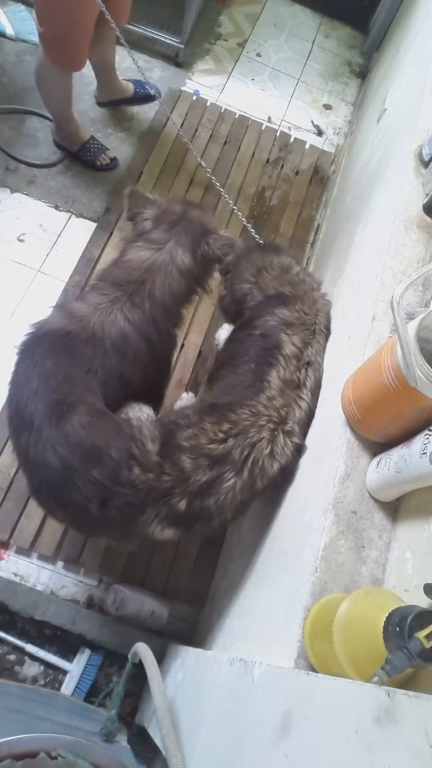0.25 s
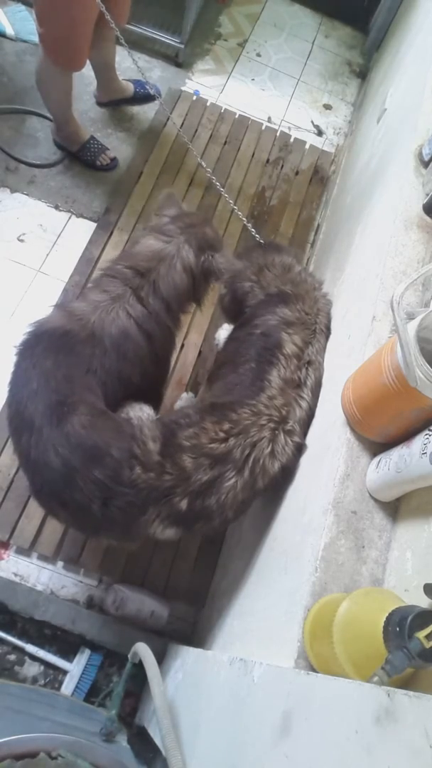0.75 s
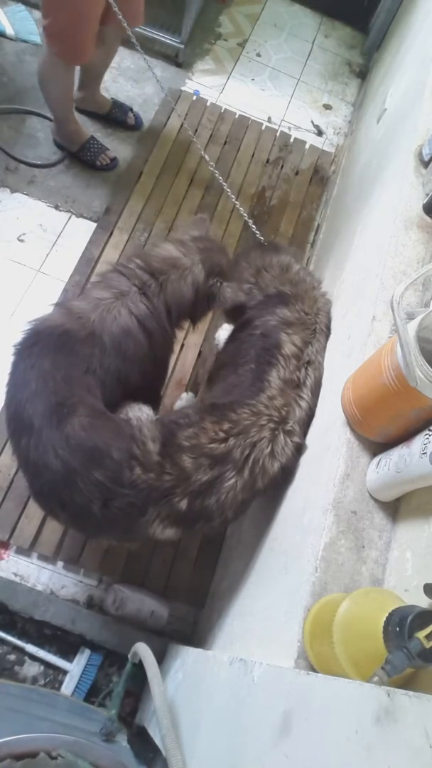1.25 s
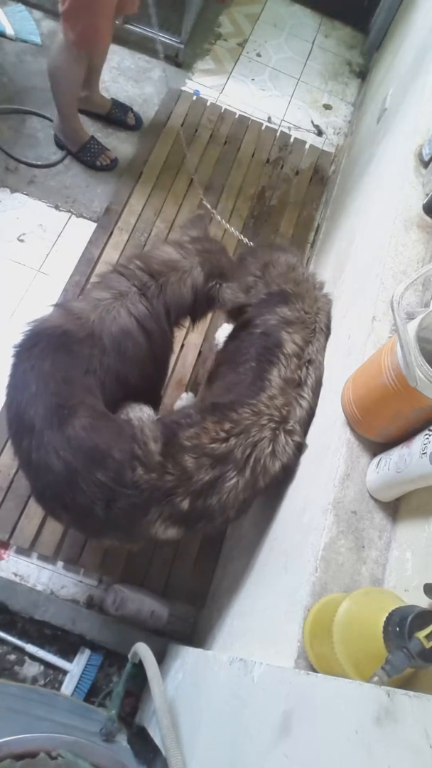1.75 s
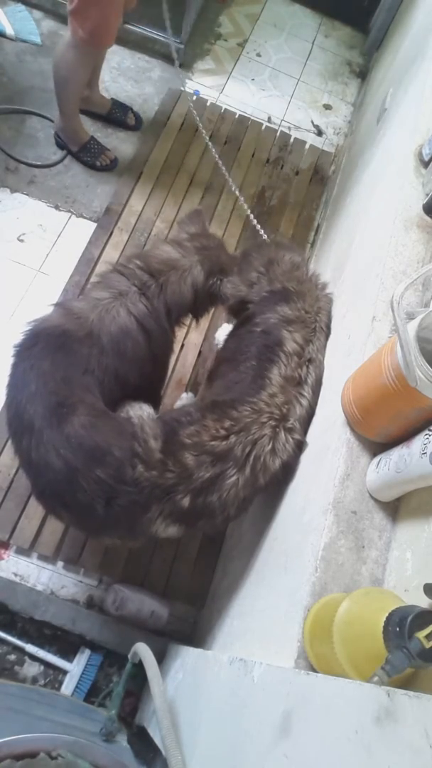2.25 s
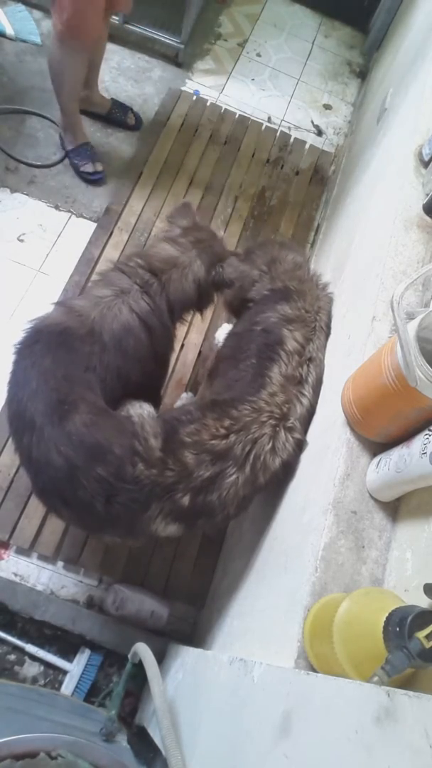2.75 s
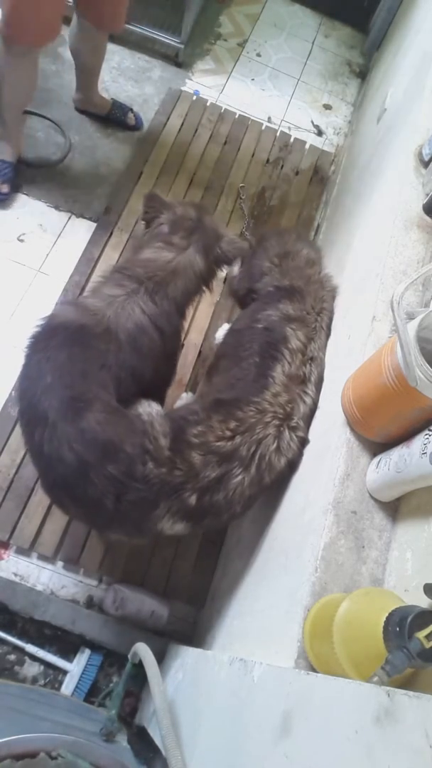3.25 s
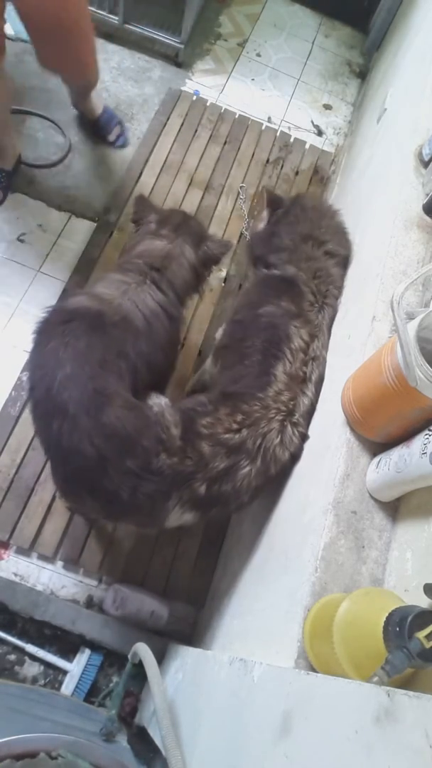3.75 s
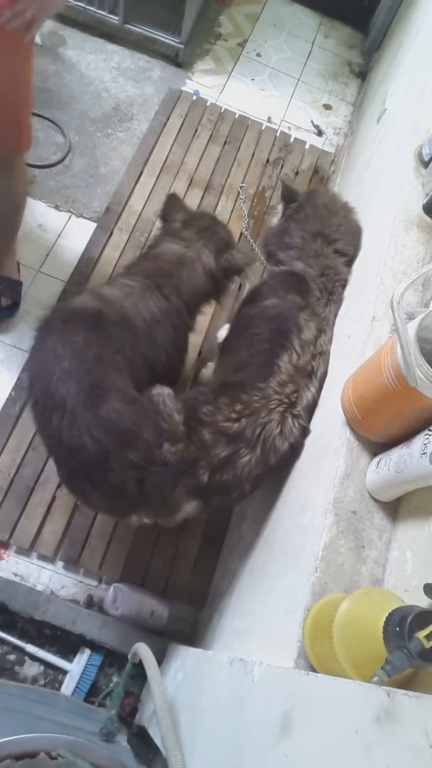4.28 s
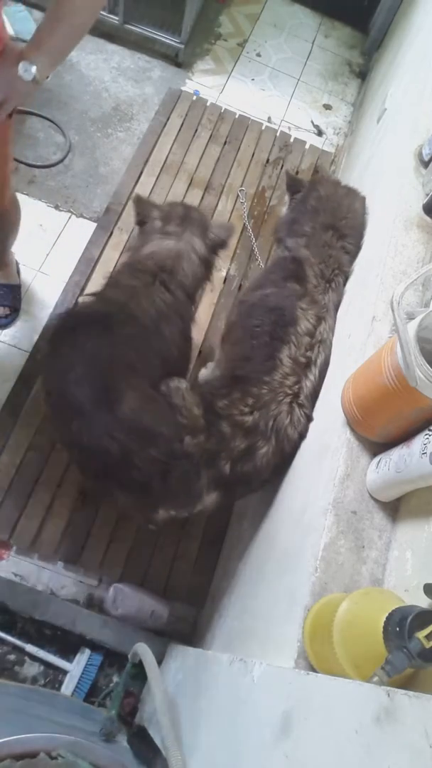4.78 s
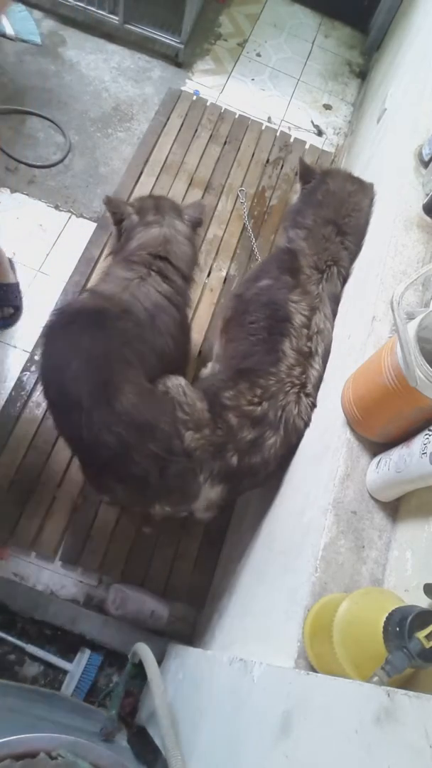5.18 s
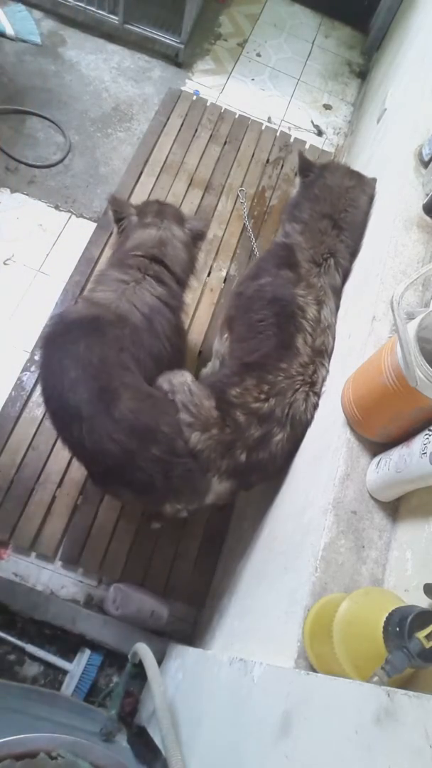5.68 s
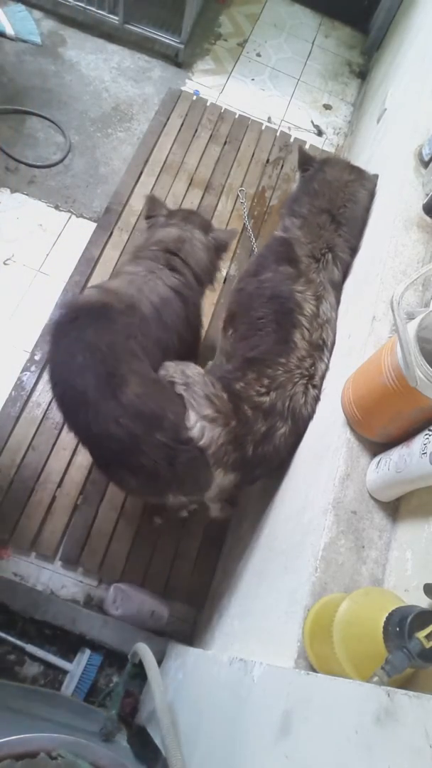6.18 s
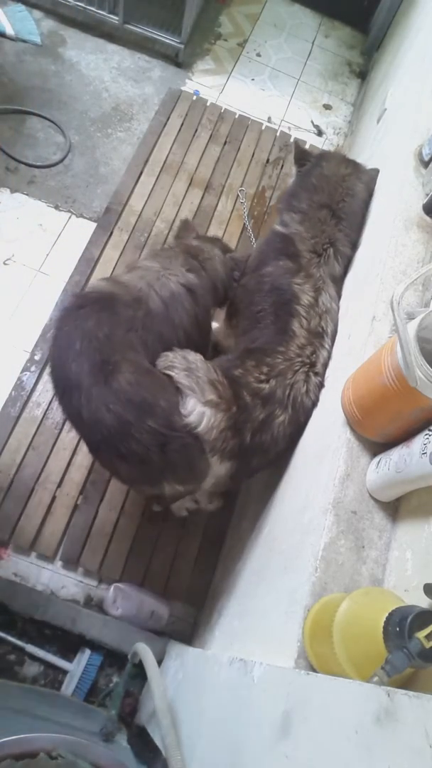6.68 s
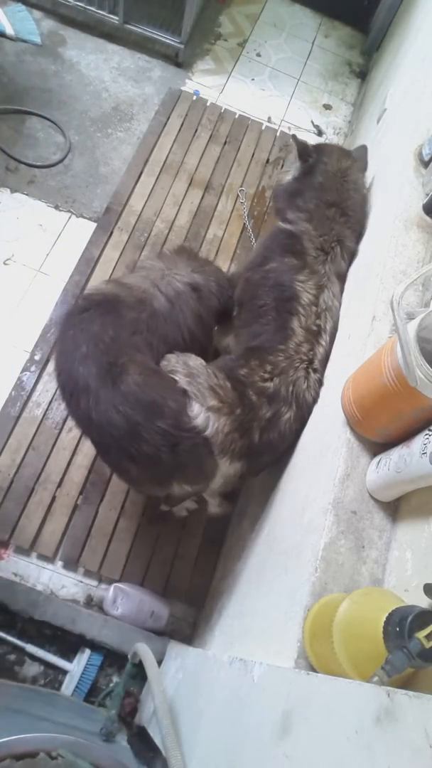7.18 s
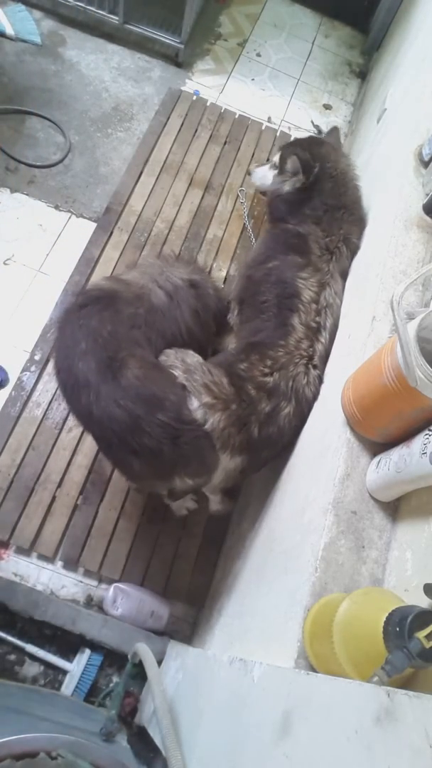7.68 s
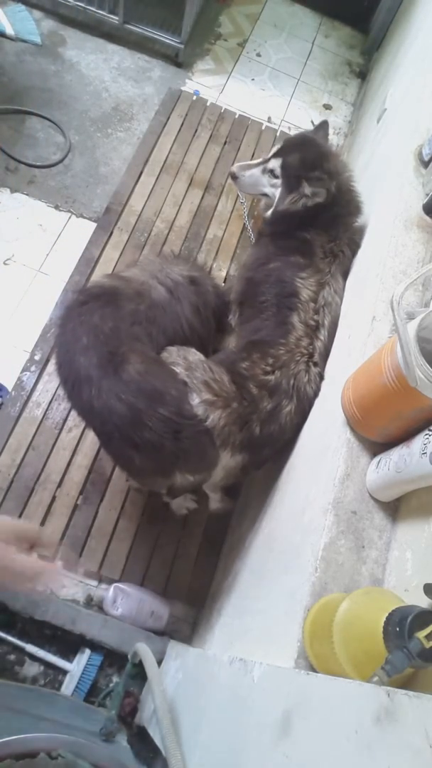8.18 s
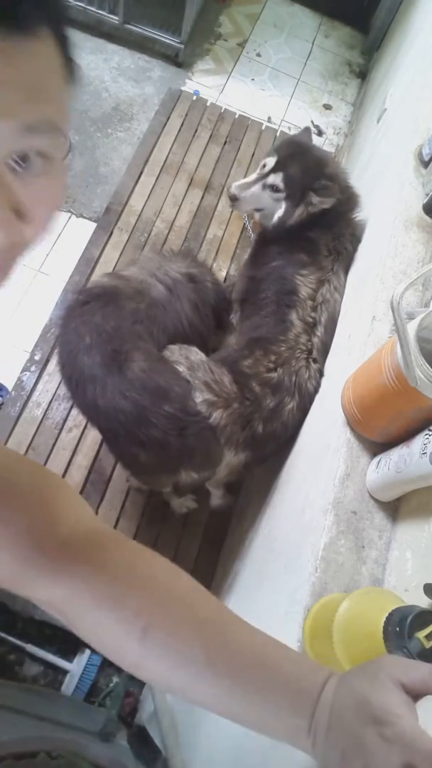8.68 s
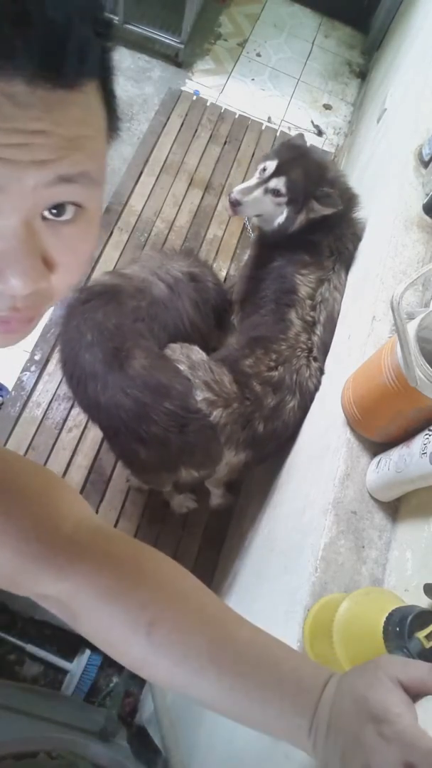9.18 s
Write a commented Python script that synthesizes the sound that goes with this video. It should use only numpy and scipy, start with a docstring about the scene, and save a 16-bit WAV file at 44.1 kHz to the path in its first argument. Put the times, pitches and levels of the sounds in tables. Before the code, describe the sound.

In a small hard-walled washroom, fans whine with a wavering, beating tone that surges about once a second over low hum and rushing air. Light chain ticks come first, then a very loud crash onto wooden slats. The background ducks for about a second and returns, sharp knocks clatter, softer scrapes follow, and faint clinks remain. A more distant motor slowly sinks and fades. Phone microphone with automatic gain, stereo.

```python
"""Washroom fans and a dropped chain leash

Fans whine, hum and blow air in a small tiled wash room where two dogs stand on a slatted deck.
The whine is three blade tones that surge and sag about once a second; the air is shaped noise.
A chain leash crashes onto the slats, things clatter later and links clink: trains of knocks ring in the room.
Behind them another motor, a stack of sinking tones, slowly runs down and fades.
The phone's gain control turns the sound down for the crash and lets it back about a second later."""
import sys
import numpy as np
from scipy import signal
from scipy.fft import rfft, irfft, next_fast_len
from scipy.io import wavfile
from scipy.ndimage import uniform_filter1d, minimum_filter1d

SR = 44100
rng = np.random.default_rng(int(sys.argv[2]) if len(sys.argv) > 2 else 0)


def transcribe(signal):
    """Save signal, clipped to [-1, 1], as a 16-bit WAV file at the path in sys.argv[1]."""
    frames = np.atleast_2d(signal).T
    limited = np.clip(frames, -1, 1)
    pcm = np.round(limited * 32767).astype(np.int16)
    wavfile.write(sys.argv[1], SR, pcm)


N = 415863
TIME = np.arange(N) / SR  # seconds

# How alike a sound is at the left and right microphone ports: (frequency [Hz], correlation)
PORT_LIKENESS = [(60, 1), (200, 0.91), (330, 0.95), (550, 0.62), (1000, -0.055), (2000, 0.063),
                 (8000, -0.051)]


def undb(db):
    """Turn decibels into gain."""
    return 10 ** (np.asarray(db) / 20)


def unit(x):
    """Scale to unit energy, averaged over the channels."""
    return x / np.sqrt(np.mean(np.sum(x ** 2, axis=-1)))


def on_log(points, hz):
    """Read a (Hz, value) table by straight lines on a log-frequency axis."""
    f, value = np.transpose(points)
    return np.interp(np.log(hz), np.log(f), value)


def shape(x, gain):
    """Filter x by gain(Hz), applied to its spectrum."""
    size = next_fast_len(x.shape[-1])
    hz = np.maximum(np.fft.rfftfreq(size, 1 / SR), 1)
    return irfft(rfft(x, size) * gain(hz), size)[..., :x.shape[-1]]


def resonances(rows, hz):
    """Gain of steep resonances (Hz, half width Hz, dB) that each pass unit white noise at their dB."""
    power = 0
    for f, half_width, db in rows:
        peak = undb(db) ** 2 * SR / (np.pi * half_width / 2) / 2
        power = power + peak / (1 + ((hz - f) / half_width) ** 2) ** 2
    return np.sqrt(power)


def walk(rate):
    """Smooth random drift with unit spread; a higher rate (Hz) wanders faster."""
    size = N // 100
    hz = np.fft.rfftfreq(size, N / SR / size)
    drift = irfft(rfft(rng.standard_normal(size)) * np.exp(-(hz / rate) ** 2), size)
    return np.interp(TIME, np.linspace(0, N / SR, size), drift / drift.std())


def port_lag(hz):
    """Phase step between the ports that gives a tone their likeness, to a random side."""
    return np.arccos(np.clip(on_log(PORT_LIKENESS, hz), -1, 1)) * rng.choice([-1, 1])


def diffuse(size):
    """Room noise at two close ports: alike in the bass, unrelated in the treble."""
    mid, side = rng.standard_normal((2, size))

    def alike(hz):
        return np.clip(on_log(PORT_LIKENESS, hz), -.99, .99)

    mid = shape(mid, lambda hz: np.sqrt((1 + alike(hz)) / 2))
    side = shape(side, lambda hz: np.sqrt((1 - alike(hz)) / 2))
    return np.array([mid + side, mid - side])


def panned(x):
    """Colour a stereo sound, since the two ports hear each band a little differently."""
    # Difference between the ports: (frequency [Hz], left minus right [dB])
    port_balance = [(200, 0), (680, 1), (1250, 0.5), (2300, 1.3), (4200, 3.8), (5500, 2.2), (7750, -1.5),
                    (12000, 1.6)]
    halves = np.array([[1], [-1]]) / 2
    return shape(x, lambda hz: undb(on_log(port_balance, hz) * halves))


def surge(kicks):
    """Extra fan speed: each kick of the drive ramps up, then sags back, on top of what the earlier ones left."""
    rise_s, sag_s = 0.32, 0.42
    t = TIME[::100]
    speed = 0
    for kick_s in kicks:
        age = np.maximum(t - kick_s, 0)
        ramp = np.minimum(age / rise_s, 1)
        speed = speed + ramp * np.exp(-np.maximum(age - rise_s, 0) / sag_s)
    return np.interp(TIME, t, speed)


def whine(flutter_db=1.44):
    """Three nearly equal blade tones surge at their own times, swell with speed and beat unevenly together."""
    # Blade tone of each fan: (resting pitch [Hz], lift per surge [Hz], slow wander [Hz])
    blade_tones = [(1129.2, 9, 0.3), (1144.4, 8.3, 0.7), (1148.8, 8, 0.7)]
    # Each fan at the phone, before swell and dip:
    # (left rms [dB], right rms [dB], phase lead of left [rad], swell per surge [dB], waver [dB])
    fan_levels = [(-35.4, -31.4, -0.55, 5.5, 0.4), (-41, -33.2, -1.4, 0, 1.3), (-36.3, -38.5, -2.2, 1, 1.2)]
    # When the drive kicks each slowed fan up to speed again; one row for each fan: (time [s], ...)
    kick_times = [
        [-0.75, -0.03, 1.0, 1.74, 2.24, 3.24, 4.22, 4.98, 5.73, 6.46, 7.49, 8.24, 8.97],
        [-0.8, -0.05, 1.0, 1.7, 2.5, 3.25, 4.3, 5.0, 5.9, 6.5, 7.4, 8.25, 9.1],
        [-0.55, 0.25, 1.05, 1.97, 2.75, 3.5, 4.25, 5.15, 6.02, 6.7, 7.45, 8.5],
    ]
    # The whine turns faint and almost stops beating after the crash:
    # (time [s], change of the lowest tone [dB], change of the upper two [dB])
    whine_dip = [(2.77, 0.6, 0.6), (2.9, 0, -6), (3.2, -4, -7), (3.4, -1.5, -4), (3.66, -1, -7),
                 (3.72, -1, 0), (4.3, -0.4, -0.2)]
    dip_s, lowest_db, upper_db = np.transpose(whine_dip)
    dips = (lowest_db, upper_db, upper_db)
    out = 0
    for tone, levels, kicks, dip_db in zip(blade_tones, fan_levels, kick_times, dips):
        rest_hz, lift_hz, wander_hz = tone
        left_db, right_db, lead, surge_db, waver_db = levels
        speed = surge(kicks)
        pitch = rest_hz + lift_hz * speed + wander_hz * walk(1.42)
        phase = 2 * np.pi * np.cumsum(pitch) / SR
        swell = surge_db * (speed - speed.mean()) + flutter_db * walk(8.4)
        swell = swell + np.interp(TIME, dip_s, dip_db)
        left = undb(left_db + swell + waver_db * walk(2.2)) * np.sin(phase + lead)
        right = undb(right_db + swell + waver_db * walk(2.2)) * np.sin(phase)
        out = out + np.array([left, right])
    return np.sqrt(2) * out  # turns rms levels into peaks


def hum(waver_db=2.8, drift_hz=0.451):
    """Motor and panel tones waver in the moving air; the higher ones reach the two ports out of step."""
    # Steady tones, before swell and waver: (frequency [Hz], rms level [dB])
    hum_tones = [(75.4, -55), (100, -54.5), (153.4, -51), (210, -54), (228.6, -43), (236.7, -39.5),
                 (240.2, -41.5), (244, -45), (251, -48), (335.1, -51.5), (452.2, -47), (457.5, -48.5),
                 (479, -50), (679.6, -56), (702.5, -53), (718.7, -57), (947.5, -56), (3978, -66)]
    # Slow swell of all these tones: (time [s], level [dB])
    hum_swell = [(0, -2), (1.6, -0.5), (2.4, 2), (3.3, -2), (4.6, 1), (5.6, 0), (6.4, -1), (9.4, -0.5)]
    out = 0
    for hz, db in hum_tones:
        phase = 2 * np.pi * np.cumsum(hz + drift_hz * walk(3.52)) / SR
        lag = port_lag(hz)
        out = out + undb(db + waver_db * walk(13.0)) * np.sin([phase, phase + lag])
    return np.sqrt(2) * out * undb(np.interp(TIME, *np.transpose(hum_swell)))


def airflow(swell_db=0.5):
    """Moving air makes a broad rush of noise and blows the resonances of the duct."""
    # Rush of air, before port colour and swell: (frequency [Hz], level in each hertz [dB])
    air_rush = [(20, -102), (30, -86.5), (55, -77.5), (100, -67), (200, -62.5), (400, -61), (600, -67),
                (1000, -66), (1400, -73), (2600, -74.5), (3600, -79.5), (5500, -82.5), (8000, -93),
                (10500, -103), (14500, -113)]
    # Duct resonances: (frequency [Hz], full width 6 dB down [Hz], rms level [dB])
    duct_modes = [(119, 22, -54), (244.7, 20, -41), (462, 50, -42), (946, 33, -48.5), (1192, 50, -45.5),
                  (1830, 240, -50), (2262, 26, -56.5)]
    halved = [(f, width / 2, db) for f, width, db in duct_modes]
    rush = shape(diffuse(N), lambda hz: undb(on_log(air_rush, hz)) * np.sqrt(SR / 2))
    ducts = shape(diffuse(N), lambda hz: resonances(halved, hz))
    return panned(rush) * undb(swell_db * walk(0.44)) + ducts


def room(early_db, split_hz=6000):
    """One second of a tiled room's answer to a click: early echoes, then a tail whose treble dies first."""
    t60_s, treble_t60_s = 0.52, 0.36  # time to fall by 60 dB
    t, noise = TIME[:SR], diffuse(SR)
    low = shape(noise, lambda hz: 1 / (1 + (hz / split_hz) ** 4))
    high = noise - low
    tail = unit(low * 1000 ** (-t / t60_s) + high * 1000 ** (-t / treble_t60_s))
    early = unit(diffuse(SR) * np.exp(-t / .004))
    return unit(tail + undb(early_db) * early)


def spots(early_db, count=4):
    """Spectra of the room's answer to several spots on the deck."""
    return rfft(np.array([room(early_db) for _ in range(count)]), 2 * SR)


def contacts(rattle_s, first_db, count, rate=950, scatter_db=5):
    """A first contact, then links landing ever more weakly, shared out over the spots as trains of clicks."""
    t = TIME[:SR // 2]
    size = (count, len(t))
    # rate is contacts per second over all spots
    trains = (rng.random(size) < rate / SR / count) * np.exp(-(t / rattle_s) ** 2)
    lands = trains > 0
    signs = rng.choice([-1, 1], lands.sum())
    trains[lands] *= signs * undb(scatter_db * rng.standard_normal(lands.sum()))
    trains[rng.integers(count), 0] = undb(first_db)
    return trains


def link_ring(t60=0.24):
    """Steel links ring high in clusters, no two quite alike: noise in narrow bands that dies away."""
    # Ringing clusters: (frequency [Hz], full width 6 dB down [Hz], relative level [dB])
    link_clusters = [(9630, 230, 3.5), (12000, 180, 10.5), (14140, 200, 1.5)]
    halved = [(f, width / 2, db) for f, width, db in link_clusters]
    t = TIME[:SR // 2]
    ring = shape(rng.standard_normal(len(t)), lambda hz: resonances(halved, hz))
    return unit(ring * np.exp(-np.log(1000) * t / t60))


def knock(gain_db):
    """A click with the spectrum gain_db(Hz) that starts at once, with no sound ahead of it."""
    size = SR // 2
    hz = np.maximum(np.fft.rfftfreq(size, 1 / SR), 1)
    # folding the cepstrum gives the click its minimum phase
    cepstrum = irfft(np.log(undb(gain_db(hz))), size)
    cepstrum[1:size // 2] *= 2
    cepstrum[size // 2 + 1:] = 0
    return unit(irfft(np.exp(rfft(cepstrum)), size))


def modes(rows):
    """A struck body's decaying tones, from rows of (Hz, t60 s, dB)."""
    t = TIME[:SR // 2]
    out = 0
    for hz, t60, db in rows:
        tone = np.cos(2 * np.pi * hz * t) * np.exp(-np.log(1000) * t / t60)
        out = out + undb(db) * unit(tone)
    return out


def add(out, s, db, body, rattle_s, first_db, paths):
    """Rattle a body at time s over the spots of paths; db is its rms if it lasted a tenth of a second."""
    trains = rfft(contacts(rattle_s, first_db, len(paths)), 2 * SR)
    start = int(s * SR)
    in_room = (trains[:, None] * paths).sum(axis=0)
    sound = unit(irfft(in_room * rfft(body, 2 * SR))[:, :SR])[:, :N - start]
    out[:, start:start + sound.shape[1]] += sound * np.sqrt(SR / 10) * undb(db)


def clatter():
    """Heavy landings crack, ring the slats, boom in the hollow under them and set the links singing."""
    # Hard things landing on deck and floor: (time [s], level over 0.1 s [dB], rattle [s],
    # brightness [dB per octave], link ring [dB], hollow boom [dB],
    # first contact over the later ones [dB], favoured slat mode [Hz])
    landings = [(2.7635, -2, 0.058, 2, -22, -28, 9.5, 1600), (2.805, -2, 0.047, 0.5, -20, -26, 8, 1600),
                (2.845, -4, 0.032, -0.5, -32, -20, 7, 1400), (2.905, -9.5, 0.061, -1.5, -35, -35, 4, 1400),
                (2.98, -11, 0.054, 0.5, -18, -5, -4, 1600), (3.012, -10.5, 0.059, 0.5, -16.5, -28, 5, 1600),
                (3.455, -32.5, 0.064, -5.5, -17, -48, -2, 1900),
                (3.975, -42.5, 0.019, 2, -22, -23, 10, 1900), (4.111, -42, 0.037, -2, -41, -27.5, 8, 1900),
                (4.468, -42, 0.0086, -3.5, -11, -29, 13, 1900), (4.485, -31, 0.025, -2.5, -5, -29, 6, 2200),
                (4.507, -30.5, 0.02, 5.5, -6, -2, 7, 2300), (4.5295, -21, 0.024, 3.5, -20, -1.5, 14, 2900),
                (4.554, -20, 0.036, 2, -15.5, -6.5, 10, 2700),
                (4.598, -25.5, 0.065, 2.5, -28, -19, 6, 2400),
                (4.68, -27.5, 0.018, -0.5, -43, -21, 6, 1900), (4.74, -28, 0.027, -0.5, -39, -25, 4, 1900),
                (4.7916, -20, 0.012, 5.5, -24, 6.5, 18, 1900),
                (4.799, -22, 0.021, 5.5, -26, -0.5, 11, 1900),
                (4.8226, -21, 0.054, 3.5, -22, -30, 19.5, 1900)]
    # Spectrum of the crack, before brightness: (frequency [Hz], relative level [dB])
    crack_spectrum = [(30, -67), (150, -31), (400, -19), (650, -13), (950, 0), (1500, 1.5), (2600, 0),
                      (4000, -3), (5500, -4.5), (7000, -13), (9000, -26), (11000, -60), (14500, -72)]
    # Modes of the slats, before favouring: (frequency [Hz], time to fall 60 dB [s], level [dB])
    slat_modes = [(1454, 0.17, -16), (1594, 0.88, -25), (1917, 0.14, -13), (2810, 0.078, -9.5),
                  (2970, 0.05, -10)]
    # The hollow under the deck, before the boom level: (frequency [Hz], time to fall 60 dB [s], level [dB])
    hollow_modes = [(996, 0.077, -5.5), (1112, 0.11, -5)]
    focus_db = 25  # modes ring this much less for each octave away from the favoured one
    out = np.zeros((2, N))
    hollow, paths = modes(hollow_modes), spots(early_db=-2.5)
    for s, db, rattle_s, bright_db, ring_db, boom_db, first_db, favoured_hz in landings:
        favoured = []
        for hz, t60, mode_db in slat_modes:
            favoured.append((hz, t60, mode_db - focus_db * abs(np.log2(hz / favoured_hz))))
        crack = knock(lambda hz: on_log(crack_spectrum, hz) + bright_db * np.log2(hz / 2000))
        body = crack + modes(favoured) + undb(boom_db) * hollow + undb(ring_db) * link_ring()
        add(out, s, db, body, rattle_s, first_db, paths)
    return panned(out)


def clinks(slope_db=12, early_db=0, first_db=3):
    """The chain touches and scrapes as it falls and as the dogs shift, and soft treble rustles brush by near
    the end: ticks in one band, plus link ring."""
    # Clinks, scrapes and late rustles: (time [s], level over 0.1 s [dB], rattle [s], centre [Hz], link ring
    # [dB])
    touches = [(1.069, -56, .042, 8000, -23), (1.307, -40.5, 0.041, 5740, -30),
               (1.408, -47.5, 0.025, 5500, -32), (1.9294, -64, .004, 11000, -17),
               (2.249, -52, .046, 6000, -30), (2.5044, -51, .015, 11000, 2),
               (2.7627, -21, 0.0032, 5300, -30), (3.745, -48, 0.093, 5160, -12),
               (4.380, -53, 0.021, 8000, -3), (5.175, -37.5, 0.065, 2800, -35),
               (5.1922, -37.5, 0.00041, 4660, -35), (5.2, -46.5, 0.11, 10500, -10),
               (5.271, -43, 0.098, 3500, -30), (5.335, -40.5, 0.044, 3500, -37),
               (5.371, -33.5, 0.052, 3400, -38), (5.474, -39, 0.046, 3380, -42),
               (5.634, -45, 0.00086, 4900, -17), (5.68, -49.5, 0.053, 5000, -12),
               (6.169, -65, .03, 9000, 0), (7.05, -51, 0.17, 7000, -6), (8.179, -56, 0.012, 10000, 2),
               (8.219, -57, 0.012, 10000, 5), (8.539, -54.5, 0.11, 11000, -22.5),
               (8.668, -53.5, 0.025, 8500, -12), (8.76, -57, 0.17, 10000, -18),
               (9.06, -56, 0.41, 9500, -18)]
    out, paths = np.zeros((2, N)), spots(early_db)
    for s, db, rattle_s, centre_hz, ring_db in touches:
        # slope_db is the fall one octave from the centre; further out it steepens, down to -60 dB
        tick = knock(lambda hz: np.maximum(-slope_db * np.abs(np.log2(hz / centre_hz)) ** 1.77, -60))
        add(out, s, db, tick + undb(ring_db) * link_ring(), rattle_s, first_db, paths)
    return panned(out)


def coasting_motor(waver_db=2):
    """A motor further off loses speed and fades: multiples of its shaft rate sink, each wavering in the room."""
    # Its tones at the start, before waver: (multiple of the shaft rate, rms level [dB])
    shaft_tones = [(3, -44), (4, -51.5), (5, -58), (7, -55), (8, -45.5), (10, -52.5), (12, -46),
                   (13, -44.5), (14, -46), (15, -55), (16, -47.5)]
    start_hz, sag_hz_per_s, fade_db_per_s = 41.7, 0.84, 1.0
    phase = 2 * np.pi * np.cumsum(start_hz - sag_hz_per_s * TIME) / SR
    out = 0
    for multiple, db in shaft_tones:
        lag = port_lag(multiple * start_hz)
        tone = np.sin([multiple * phase, multiple * phase + lag])
        out = out + undb(db + waver_db * walk(2.3)) * tone
    return np.sqrt(2) * out * undb(-fade_db_per_s * TIME)


def scene():
    """Fans throughout, the chain and clatter on top, a slowing motor behind them."""
    return whine() + hum() + airflow() + clatter() + clinks() + coasting_motor()


def gain_control(x, ceiling_db=-11, hold_s=0.76, release_s=0.14, ahead_s=0.0072, bass_hz=190, shed=3.2):
    """Turn down just ahead of an overload, hold, then creep back; shed bass during a strong overload."""
    shed_above_db = 4.5  # overload beyond which the bass drops, by shed dB for each dB more
    power = uniform_filter1d(np.mean(x ** 2, axis=0), SR // 100)
    over = np.maximum(10 * np.log10(np.maximum(power, 1e-12)) - ceiling_db, 0)
    over = np.roll(over, -int(ahead_s * SR))
    half = int(hold_s * SR / 2)
    # the greatest overload within the hold time
    held = -minimum_filter1d(-over, 2 * half + 1, origin=half, mode="constant")
    # the reduction in dB dies away exponentially once the hold is over
    fade = np.exp(-TIME / release_s)
    x = x * undb(-np.maximum.accumulate(held / fade) * fade)
    bass = shape(x, lambda hz: 1 / (1 + (hz / bass_hz) ** 12))
    heavy = uniform_filter1d(np.maximum(over - shed_above_db, 0), SR // 30)
    return x - bass * (1 - undb(-shed * heavy))


def record(dry):
    """The phone rides its gain, clips the tallest peaks and cuts the treble above 14.5 kHz."""
    held = np.clip(gain_control(dry), -.85, .85)
    top_cut = signal.ellip(12, .2, 80, 14500, fs=SR, output="sos")
    return signal.sosfilt(top_cut, held)


dry = scene()
out = record(dry)
transcribe(out)
```